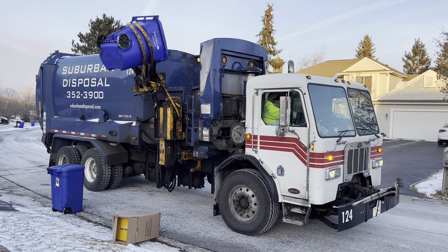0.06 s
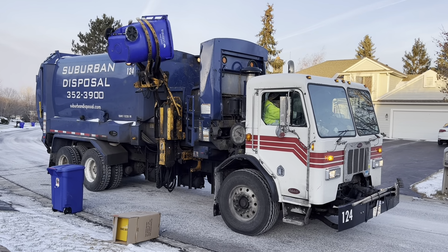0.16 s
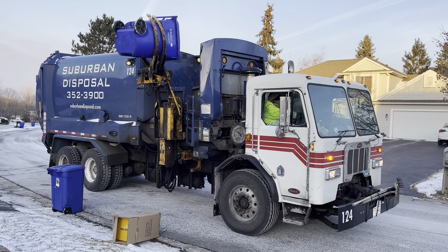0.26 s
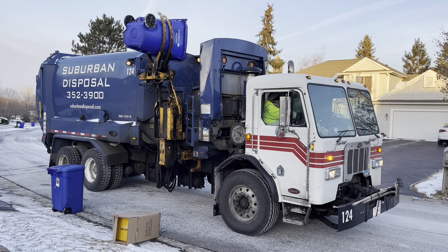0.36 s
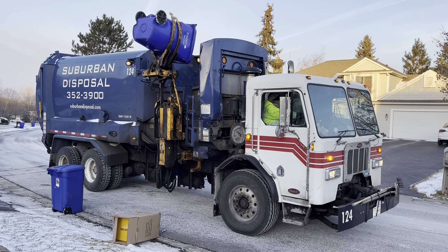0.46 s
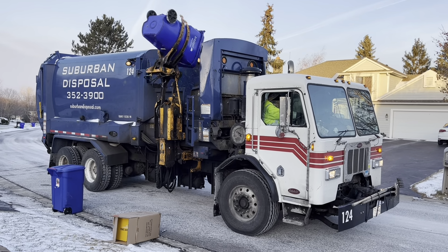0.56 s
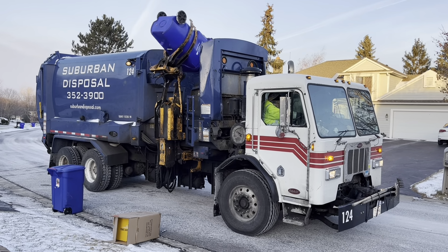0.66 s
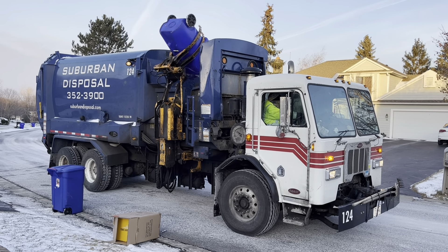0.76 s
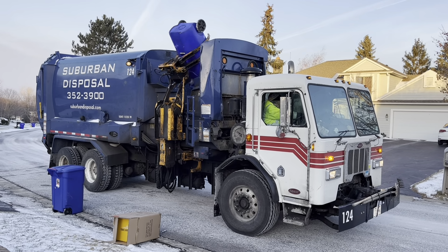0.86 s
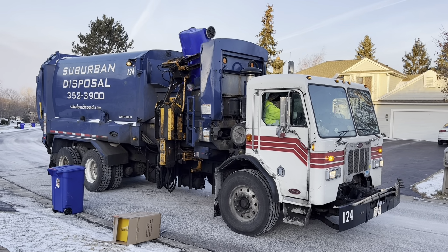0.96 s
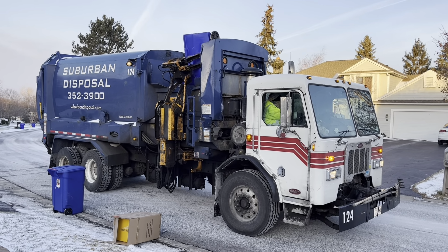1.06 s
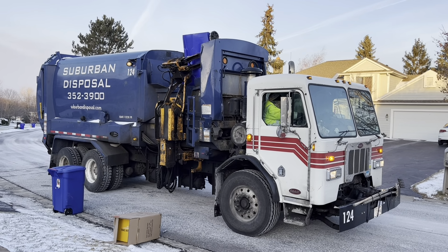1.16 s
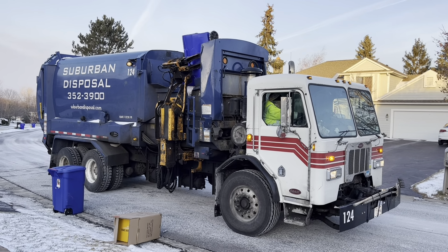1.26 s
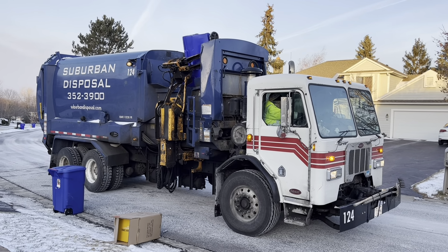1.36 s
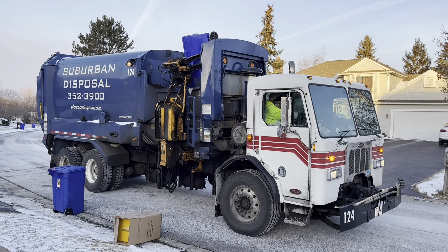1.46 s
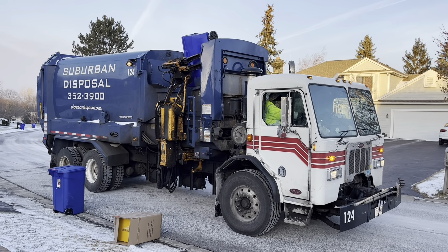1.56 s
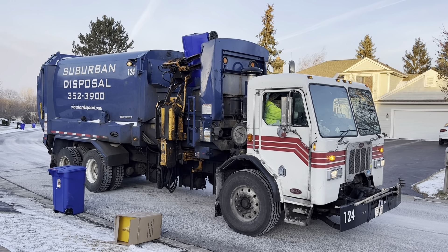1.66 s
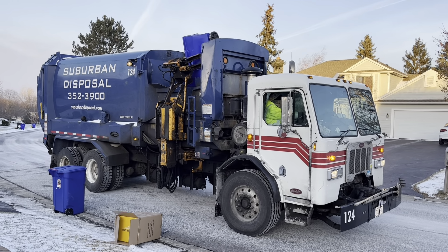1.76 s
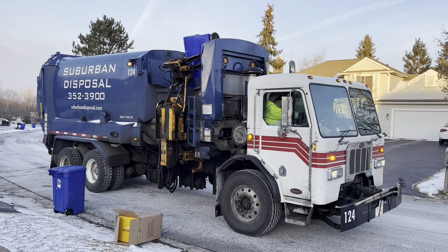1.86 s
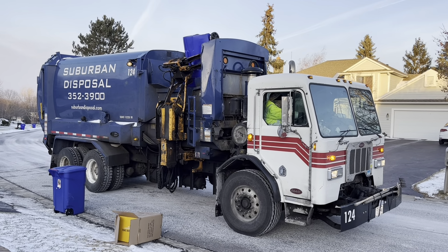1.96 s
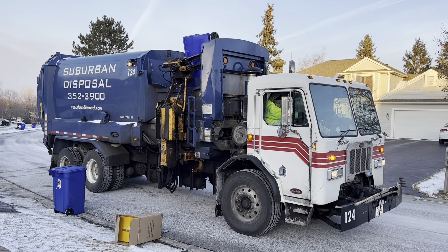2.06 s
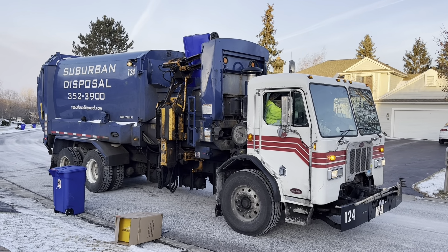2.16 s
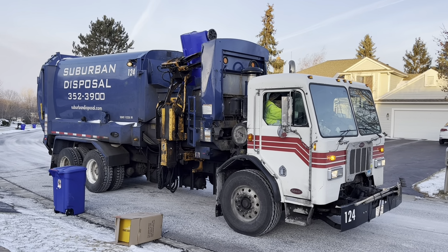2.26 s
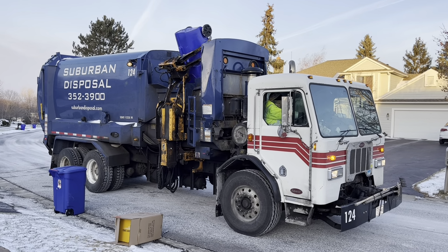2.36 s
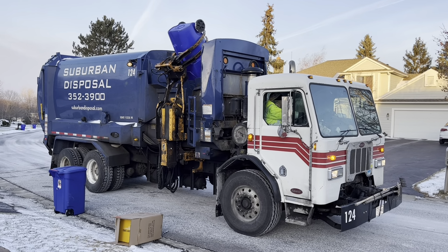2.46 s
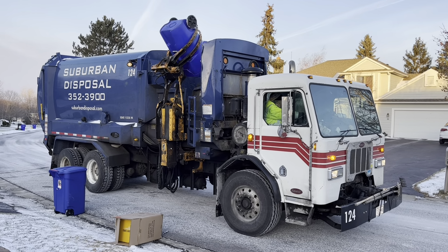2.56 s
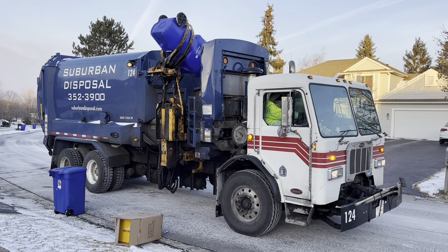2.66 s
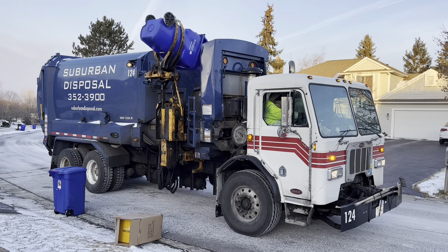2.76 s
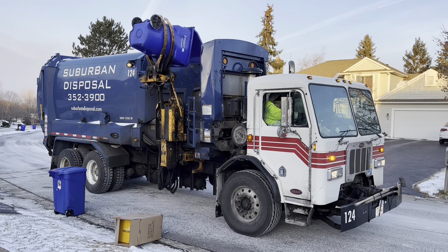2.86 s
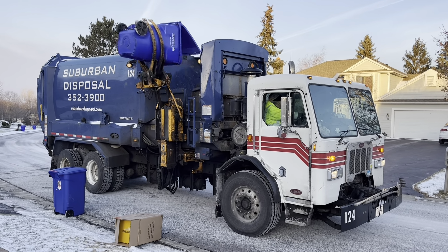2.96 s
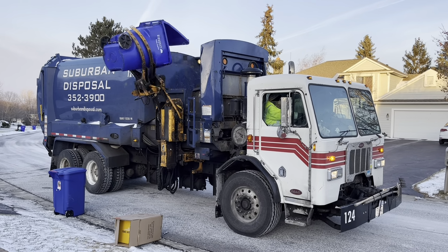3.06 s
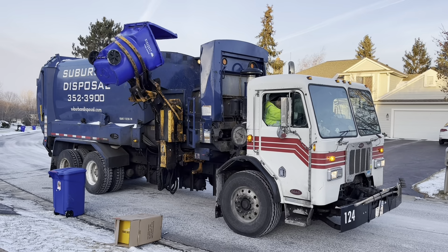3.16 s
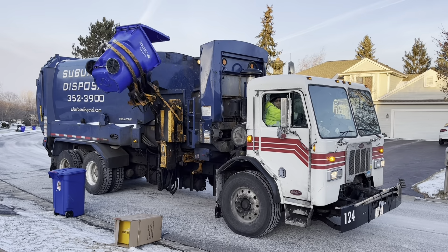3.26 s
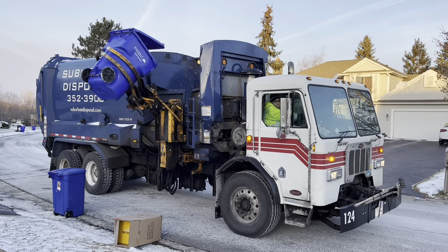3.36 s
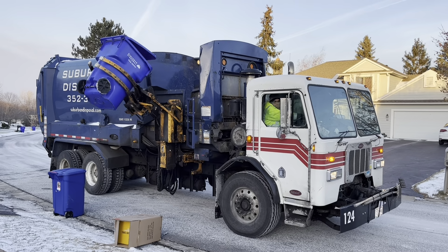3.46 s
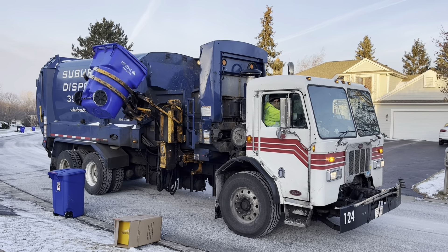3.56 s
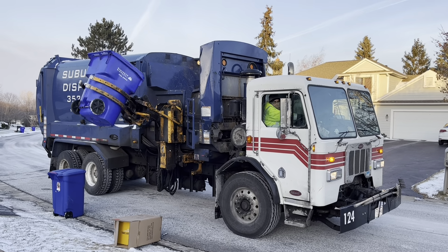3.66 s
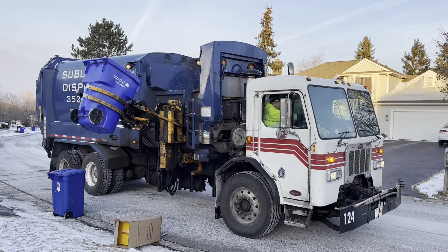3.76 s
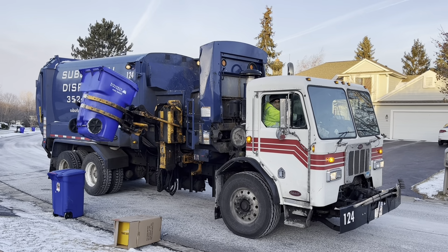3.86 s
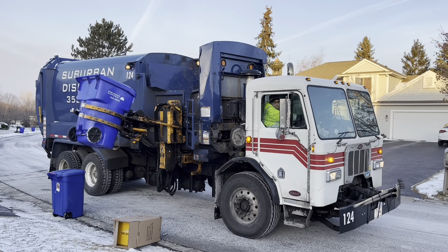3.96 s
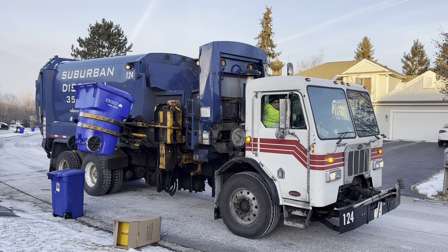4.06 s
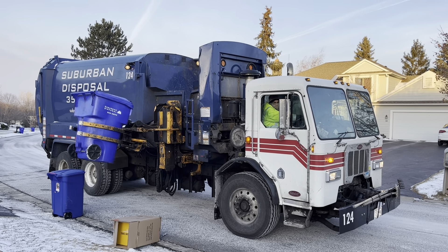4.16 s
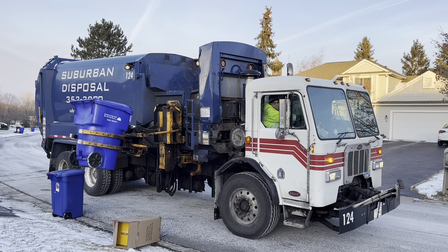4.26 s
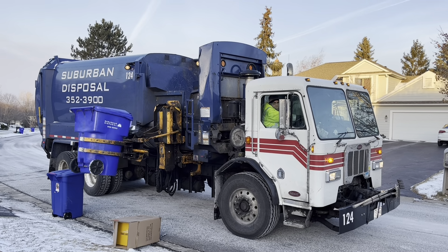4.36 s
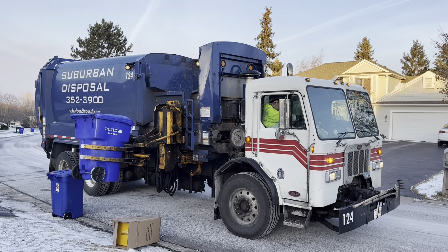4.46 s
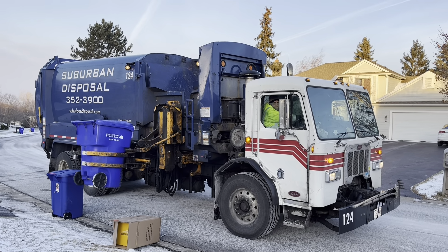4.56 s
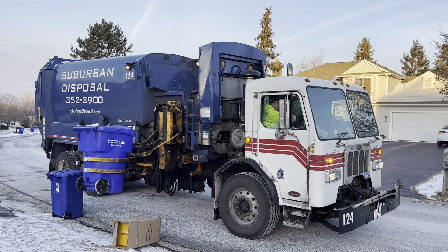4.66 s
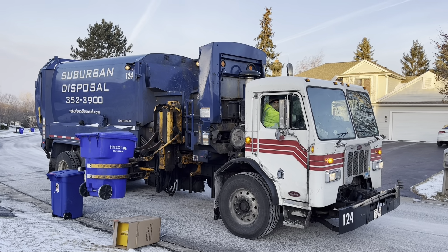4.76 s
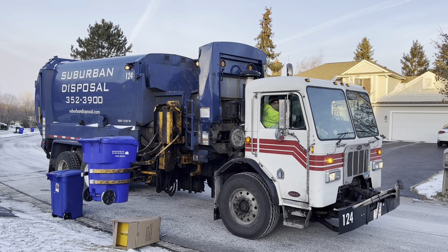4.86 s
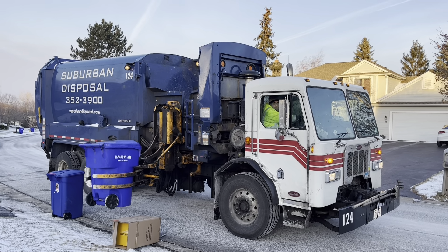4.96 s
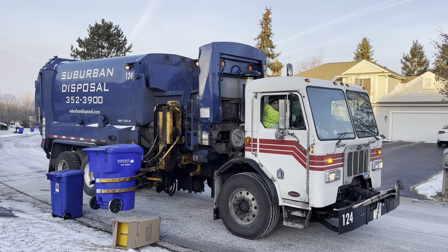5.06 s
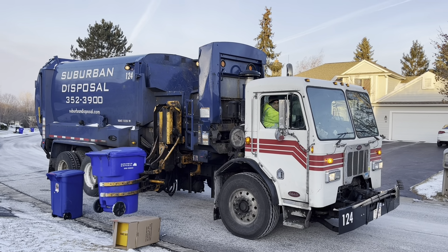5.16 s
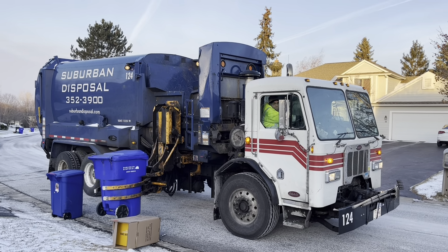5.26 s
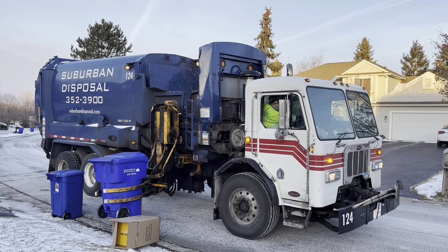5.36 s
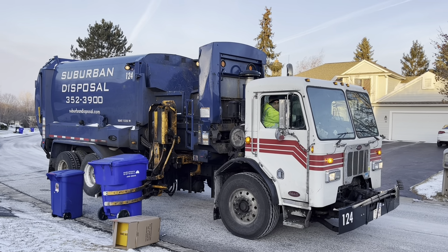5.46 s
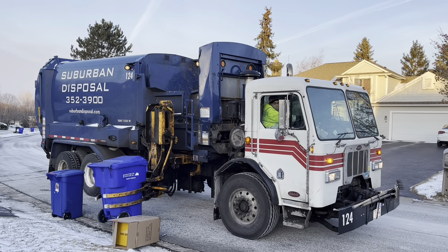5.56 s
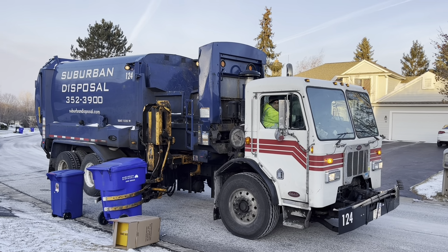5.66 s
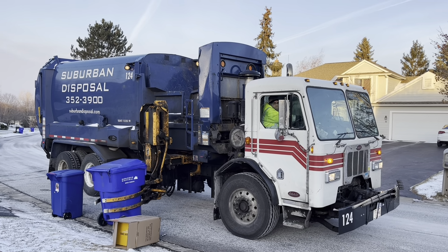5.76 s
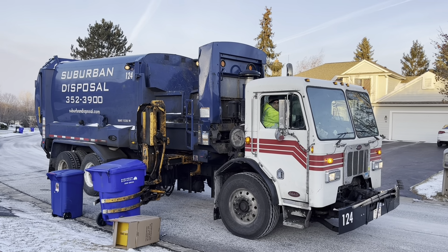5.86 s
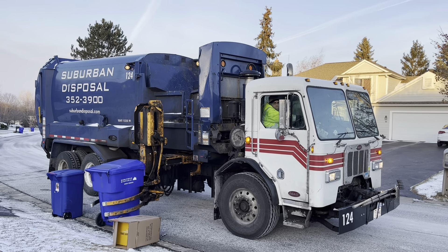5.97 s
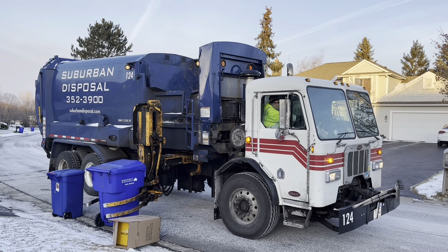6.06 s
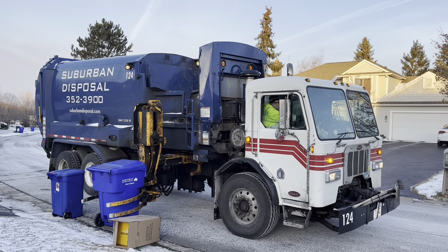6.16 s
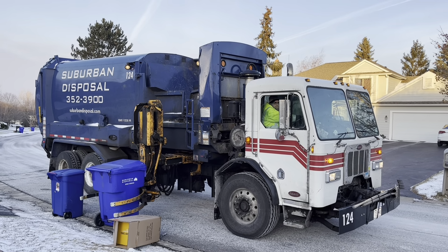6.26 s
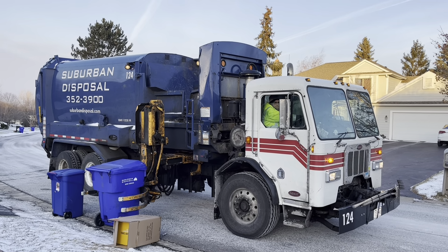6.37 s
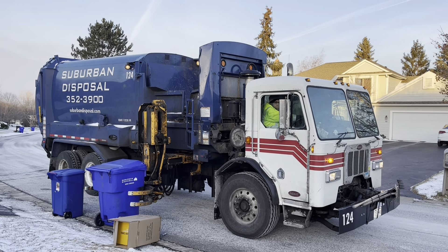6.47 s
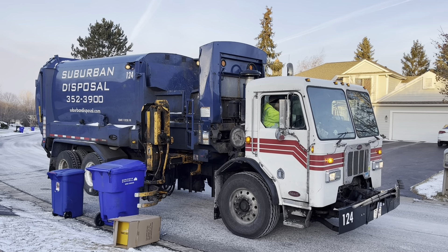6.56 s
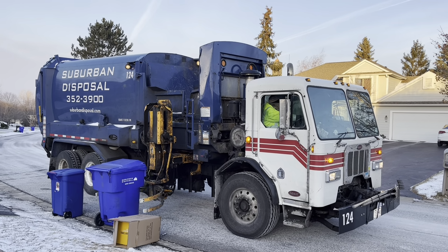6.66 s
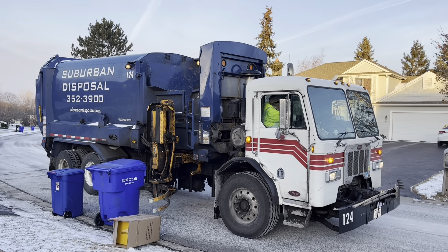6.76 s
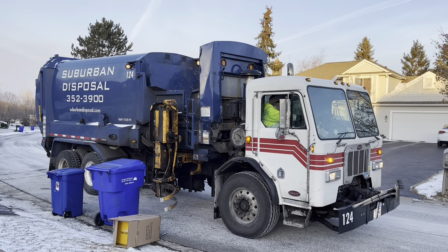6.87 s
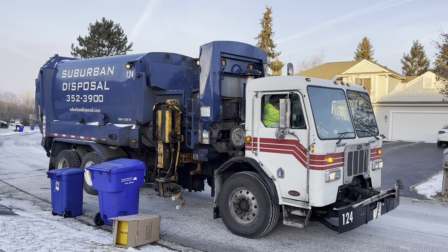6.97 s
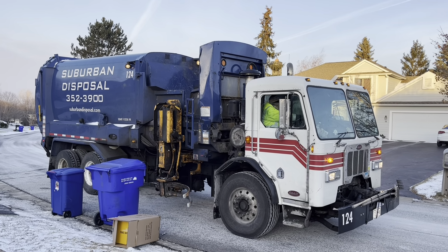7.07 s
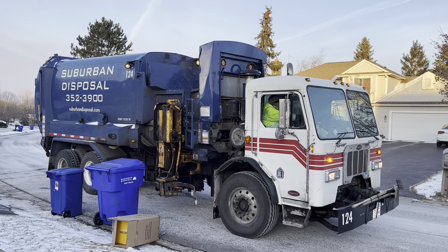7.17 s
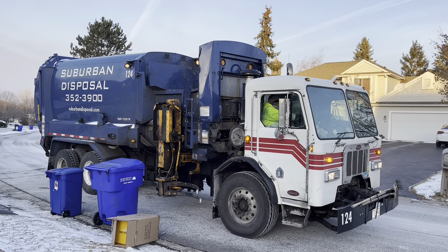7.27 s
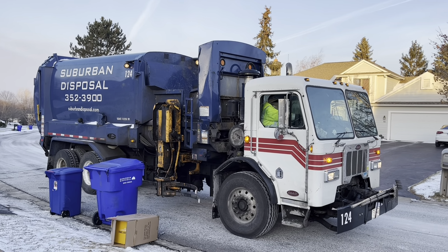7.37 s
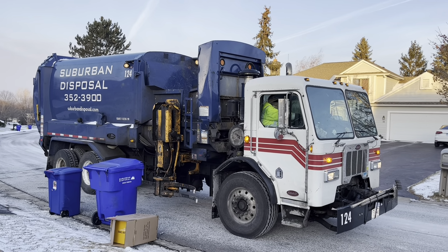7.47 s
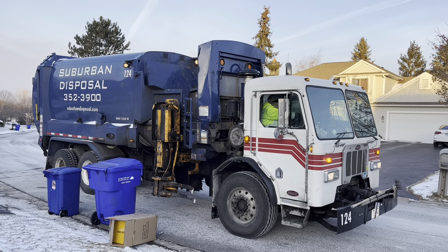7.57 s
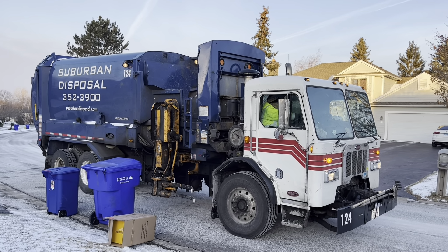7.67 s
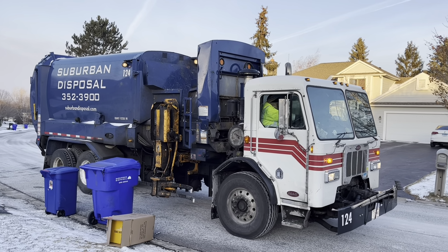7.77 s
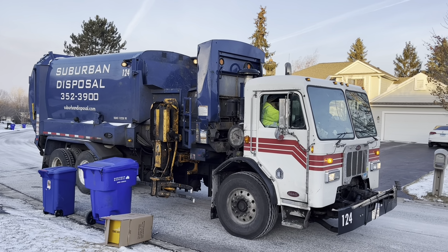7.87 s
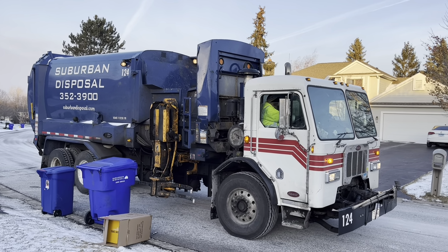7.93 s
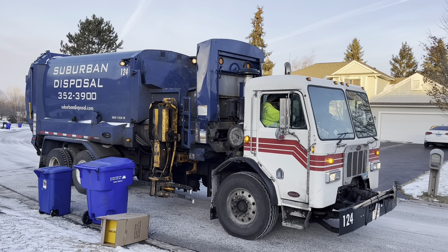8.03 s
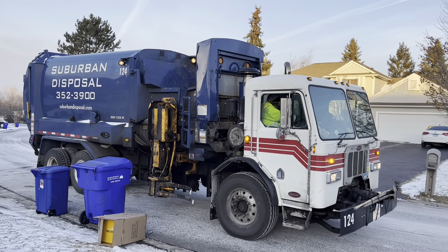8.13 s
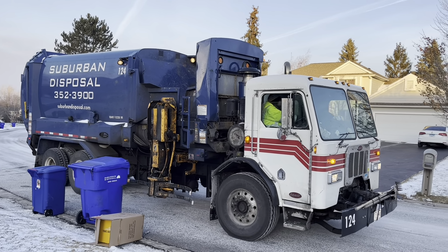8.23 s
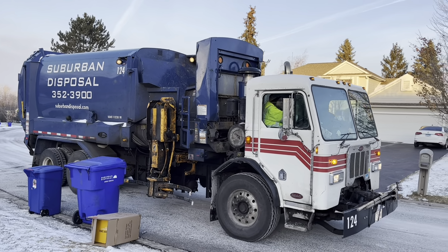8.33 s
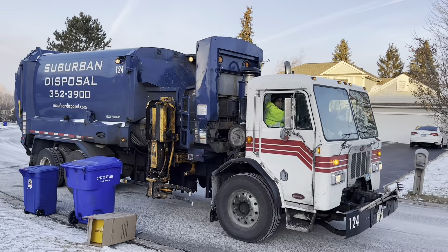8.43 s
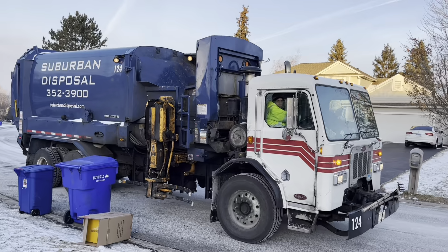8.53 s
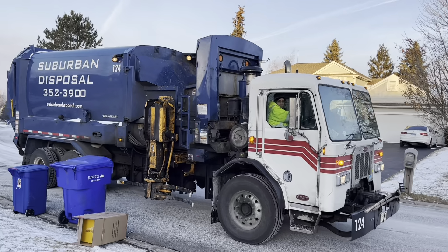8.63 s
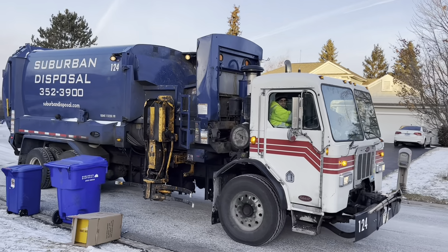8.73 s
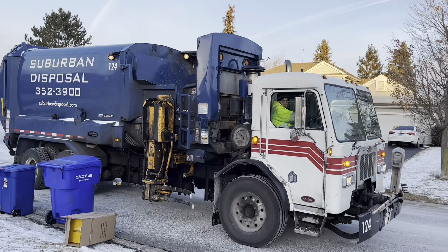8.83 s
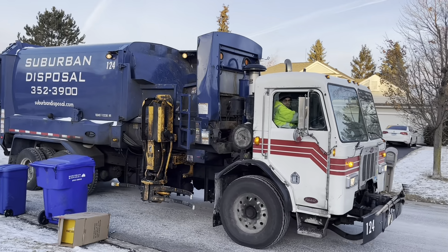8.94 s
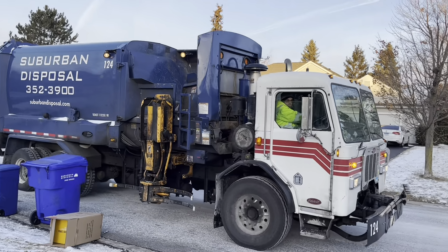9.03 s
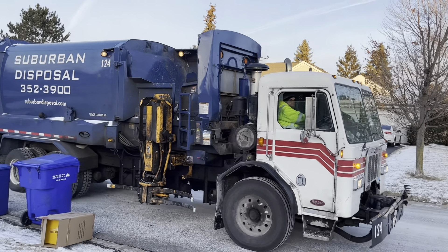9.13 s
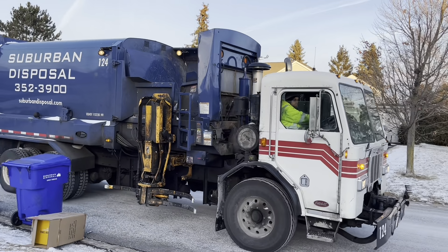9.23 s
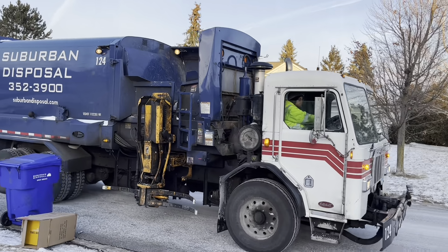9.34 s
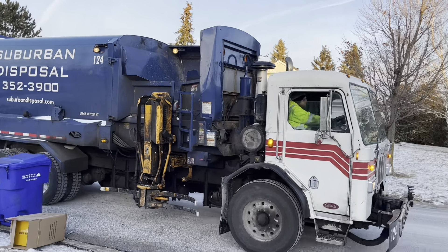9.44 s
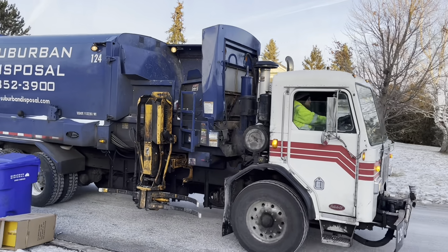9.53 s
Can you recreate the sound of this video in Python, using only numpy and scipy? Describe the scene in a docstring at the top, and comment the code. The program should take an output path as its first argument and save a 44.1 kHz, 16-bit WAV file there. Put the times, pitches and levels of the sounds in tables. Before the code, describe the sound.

Close by on a residential street, a diesel refuse truck idles with a steady pump hum while its arm slams a plastic bin against the hopper. More crashes follow, then hollow thumps as the bin swings down. The grip rasps free, steel fingers clank and fold, air brakes hiss, and the truck pulls away with rising engine roar and whine. Stereo microphone at the kerb, short echoes from houses.

```python
"""A diesel refuse truck idles in a street while its hydraulic arm shakes a plastic cart over the hopper,
swings it down with hollow thumps, sets it on the kerb and folds away with steel clanks.
The air brake lets go and the truck pulls off, its pump whine and turbo whistle rising with the engine.
The engine is noise pulsing at the firing rate, the pump and whistles are sines with wavering pitch,
and the blows are bursts of noise and dying sines; house fronts add echoes."""
import sys
import numpy as np
from scipy import signal
from scipy.fft import rfft, irfft, next_fast_len
from scipy.io import wavfile
from scipy.ndimage import uniform_filter1d

SR = 44100
rng = np.random.default_rng(int(sys.argv[2]) if len(sys.argv) > 2 else 0)


def waveform_to_disk(signal):
    """Save audio, clipped to [-1, 1], as 16-bit WAV at the path in sys.argv[1]."""
    frames = np.transpose(np.atleast_2d(signal))
    scaled = np.clip(frames, -1, 1) * 32767
    samples = np.round(scaled).astype(np.int16)
    wavfile.write(sys.argv[1], SR, samples)


N = 423360

# strokes of the arm load the engine: lift, tip, shake, swing out, lower, brake, let go, draw in, fold, stow
# (start [s], end [s], rumble level [dB], roar level [dB, before the engine's trim],
#  pump hum against its usual level [dB])
ARM_STROKES = [(0, 0.858, -28.5, -28, 1.5), (0.968, 1.38, -24, -25.5, -3), (1.468, 2.805, -29.5, -27, 2),
               (2.883, 3.504, -23, -28, 2), (3.59, 4.5, -26, -26.5, -0.5), (4.7, 4.862, -27.5, -26, -8),
               (5.873, 6.26, -29, -26.5, 0), (6.426, 6.705, -24, -25, -7), (7.16, 7.496, -35, -26.5, -6),
               (7.606, 7.917, -29.5, -25.5, 3.5)]
THROTTLE_CLATTER_DB = 2.5  # rise of the clatter from no throttle to full throttle
CLATTER_DB_PER_OCTAVE = 9.5  # growth of the clatter each time the engine speed doubles


def from_db(db):
    """Turn decibels into a gain."""
    return 10 ** (np.asarray(db) / 20)


def rms_one(x):
    """Scale a sound to unit power."""
    return x / np.sqrt(np.mean(x ** 2) + 1e-20)


def in_time(rows):
    """Read each column of a curve at every sample, with straight lines between its points."""
    s, *columns = np.transpose(rows)
    t = np.arange(N) / SR
    return [np.interp(t, s, column) for column in columns]


def at_bins(points, size=N):
    """Read a table over log frequency at the bins of an FFT."""
    hz, value = np.transpose(points)
    bin_hz = np.arange(size // 2 + 1) * SR / size
    return np.interp(np.log(bin_hz + 1), np.log(hz), value)


def noise(spectrum):
    """Make noise of a given colour and unit power by shaping white noise."""
    white = rfft(rng.standard_normal(N))
    return rms_one(irfft(white * from_db(at_bins(spectrum)), N))


def drift(rate):
    """Make a slow random curve of spread 1; a higher rate [Hz] wanders faster."""
    size = N // 20  # drawn at every 20th sample
    hz = np.arange(size // 2 + 1) * SR / N
    slow = irfft(rfft(rng.standard_normal(size)) / (1 + (hz / rate) ** 2), size)
    return np.interp(np.arange(N) / 20, np.arange(size), rms_one(slow))


def band(x, low_hz, high_hz):
    """Keep only the range between two frequencies."""
    edges = [low_hz, min(high_hz, .45 * SR)]
    return signal.sosfilt(signal.butter(3, edges, "band", fs=SR, output="sos"), x)


def band_noise(low_hz, high_hz, size=N):
    """Make noise of unit power between two frequencies."""
    return rms_one(band(rng.standard_normal(size), low_hz, high_hz))


def ring(clicks, hz, t60):
    """A unit click sets a sine of height 1 ringing; it falls by 60 dB in t60 seconds."""
    r, w = from_db(-60 / (t60 * SR)), 2 * np.pi * hz / SR
    return signal.lfilter([0, np.sin(w)], [1, -2 * r * np.cos(w), r * r], clicks + 1e-18)


def fade(clicks, t60):
    """A unit click starts a level of 1 that falls by 60 dB in t60 seconds."""
    return signal.lfilter([1], [1, -from_db(-60 / (t60 * SR))], clicks + 1e-18)


def clicks_at(times, sizes):
    """Place one click for each event."""
    return np.bincount((np.asarray(times) * SR).astype(int), sizes, N)[:N]


def struck(times, level_db, modes, spread_db):
    """Every blow excites each ringing mode with a random strength and sign of its own."""
    chance = rng.standard_normal((len(times), len(modes), 2))
    total = 0
    for k, (hz, db, t60) in enumerate(modes):
        strength = from_db(level_db + db + spread_db * chance[:, k, 0])
        sign = np.sign(chance[:, k, 1])
        total = total + ring(clicks_at(times, strength * sign), hz, t60)
    return total


def tone(hz, waver, rate):
    """Make a sine of unit power whose pitch wavers by a share of itself."""
    wavering_hz = hz * (1 + waver * drift(rate))
    return np.sqrt(2) * np.sin(2 * np.pi * np.cumsum(wavering_hz) / SR)


def held(start, end, attack_s, release_s):
    """A gate that opens just ahead of its start, holds, and dies away after its end."""
    t = np.arange(N) / SR
    opening = np.clip((t - start) / attack_s + 1, 0, 1)
    return opening * np.exp(-np.maximum(t - end, 0) / release_s)


def firing_gate(firings, depth, decay, uneven_db):
    """Each firing flares and dies; the six cylinders differ and no two cycles are alike."""
    # strength of each firing in the cycle (level [dB])
    cylinders_db = np.array([0, -1, 0, -2, 0.5, 0])
    index = firings.astype(int)
    chance_db = uneven_db * rng.standard_normal(index.max() + 1)[index]
    strength = from_db(cylinders_db[index % len(cylinders_db)] + chance_db)
    since_firing = firings % 1  # as a share of the gap between firings
    return rms_one(1 + depth * strength * np.exp(-since_firing / decay))


def under_load(column, rest_db):
    """The load builds up before each arm stroke, holds, and ebbs to a resting level [dB] after it."""
    levels = []
    for (start, end, *_), db in zip(ARM_STROKES, column):
        levels.append(from_db(db) * held(start, end, attack_s=0.2, release_s=0.35))
    return 20 * np.log10(np.maximum(np.max(levels, axis=0), from_db(rest_db)))


def engine(tooth_hz, octaves, throttle, load_rumble_db, load_roar_db):
    """Exhaust, block and combustion clatter pulse at the firing rate; load, throttle and speed set them."""
    # colours of the engine's three voices (frequency [Hz], level per Hz [dB])
    rumble_spectrum = [(20, -29), (35, -13), (55, -0.5), (85, 3.5), (125, 0), (195, -0.5), (280, -7),
                       (350, -9.5), (600, -41.5)]
    roar_spectrum = [(170, -16.5), (270, -15.5), (370, -0.5), (480, -0.5), (620, -3), (760, -4),
                     (1000, -10.5), (1400, -41), (2800, -78)]
    clatter_spectrum = [(560, -14), (950, -7.5), (1250, -4.5), (1600, -8.5), (2100, -7), (2900, -12.5),
                        (3800, -14.5), (5200, -23.5), (7300, -21), (9300, -27.5), (12000, -26),
                        (15000, -30)]
    # the deepest boom of the body swells and sinks (time [s], level of the lowest bass [dB])
    deep_curve = [(2.2, 5), (2.4, 4), (4.4, 12.5), (4.6, -4), (5.2, 8), (6.1, 0), (8.35, -10), (8.55, 14)]
    teeth_per_firing = 5.1  # pump teeth that pass between two firings
    drive_rumble_db, drive_roar_db = -29.5, -27  # at full throttle, before the growth with speed
    roar_db_per_octave, roar_trim_db = 12.5, -0.98
    idle_clatter_db = -34.4

    rumble_db = (1 - throttle) * load_rumble_db + throttle * drive_rumble_db
    roar_db = (1 - throttle) * load_roar_db + throttle * drive_roar_db
    roar_db = roar_db + roar_db_per_octave * octaves + roar_trim_db
    clatter_db = idle_clatter_db + throttle * THROTTLE_CLATTER_DB + CLATTER_DB_PER_OCTAVE * octaves
    # the exhaust pipe booms most at 0.56 octaves above idle speed and fades to either side
    pipe_db = -21.5 - 25 * np.abs(octaves - 0.56)
    deep_db, = in_time(deep_curve)
    firings = np.cumsum(tooth_hz / teeth_per_firing) / SR

    exhaust = noise(rumble_spectrum)
    deep = signal.sosfiltfilt(signal.butter(4, 60, fs=SR, output="sos"), exhaust)
    exhaust = exhaust + (from_db(deep_db) - 1) * deep
    rumble = from_db(rumble_db) * exhaust
    rumble = rumble * firing_gate(firings, depth=0.32, decay=0.1, uneven_db=4.0)
    roar = from_db(roar_db) * noise(roar_spectrum)
    roar = roar * firing_gate(firings, depth=0.54, decay=0.17, uneven_db=1.5)
    clatter = from_db(clatter_db) * noise(clatter_spectrum)
    clatter = clatter * firing_gate(firings, depth=0.31, decay=0.98, uneven_db=5.0)
    pipe = throttle * from_db(pipe_db) * band_noise(116, 284)
    pipe = pipe * firing_gate(firings, depth=0.81, decay=0.71, uneven_db=6.5)
    return rumble + roar + clatter + pipe


def pump_hum(tooth_hz, octaves, throttle, strain_db):
    """The gear pump hums on its tooth rate and swells as it sweeps the frame's resonances."""
    # harmonics 1 to 4
    # (level with no throttle [dB], rise on throttle [dB], rise per octave of speed [dB])
    harmonics = [(-35, -0.5, 2), (-46, 14, 8), (-52, 11.5, 9.5), (-48, 12.5, -5.5)]
    # frame resonances that the harmonics sweep (frequency [Hz], half width [Hz], lift [dB])
    resonances = [(256, 12.3, 12.5), (325, 29.7, 16), (353, 6.5, 4), (450, 25, 8.5), (561, 25, 5.5),
                  (648, 26, 4.5), (723, 12, 8), (940, 40, 4.5), (1120, 55, 0)]
    roughness = 0.44  # on throttle: size of each harmonic's rough skirt against its clean line
    turn = 2 * np.pi * np.cumsum(tooth_hz * (1 + 0.0019 * drift(14.0))) / SR
    hum = 0
    for k, (db, throttle_db, octave_db) in enumerate(harmonics, 1):
        frame_db = sum(lift_db * np.exp(-((k * tooth_hz - hz) / width) ** 2)
                       for hz, width, lift_db in resonances)
        level_db = db + (1 - throttle) * strain_db + throttle * throttle_db
        level_db = level_db + frame_db + octave_db * octaves + 2.2 * drift(30)
        skirt = drift(68) * np.sin(k * turn) + drift(60) * np.cos(k * turn)
        clean = np.sqrt(2) * np.sin(k * turn)
        hum = hum + from_db(level_db) * (clean + throttle * roughness * skirt)
    return hum


def valve_whistles():
    """Oil sings in the valves: sines whose pitch wavers and whose level flutters."""
    # (start [s], end [s], pitch [Hz], level [dB], pitch waver [share], flutter [dB])
    whistles = [(0, 1.25, 2170, -43.5, 0.0016, 1.5), (0, 1.3, 3208, -47, 0.0005, 1.2),
                (2.55, 3.0, 2166, -50, .003, 2), (3.9, 4.25, 2166, -45.5, 0.003, 1.5),
                (4.5, 5.3, 2166, -51, .003, 2), (2.1, 4.7, 3208, -56, .0008, 3),
                (3.8, 6.1, 1462, -50, 0.0033, 2.5)]
    total = 0
    for start, end, hz, db, waver, flutter_db in whistles:
        level = from_db(db + flutter_db * drift(15)) * held(start, end, attack_s=0.2, release_s=0.2)
        total = total + level * tone(hz, waver, rate=35.5)
    return total


def clanks():
    """A blow cracks, rattles the steel panels, rings hopper and arm, and has a dull rebound."""
    # blows of arm and cart on the steel body; the levels are taken before the offsets further down
    # (time [s], crash level [dB], weight: lows above the crash [dB], first crack level [dB])
    blows = [(0.803, -40, 11, -38), (0.902, -25, 15, -35), (0.931, -20, 6, -22), (0.981, -19, 9, -27),
             (0.992, -23, 11, -25), (1.028, -23, 9, -25), (1.036, -26, 21, -30), (1.397, -27, 11.5, -35),
             (3.132, -14.5, 8.5, -29), (3.167, -16, 12, -18), (3.196, -26, 12, -30),
             (3.339, -21.5, 11, -22), (3.575, -25, 10, -36), (3.632, -15, 10, -13), (3.667, -23.5, 12, -28),
             (5.783, -24, 14, -32), (6.237, -26.5, 8, -25), (6.261, -23.5, 11, -22), (6.476, -40, -12, -31),
             (6.76, -22.5, 2.5, -16), (6.911, -26, 5, -33), (6.978, -26.5, 3, -31.5),
             (7.062, -21, 3.5, -32), (7.089, -21.5, 3, -28), (7.143, -26, 2, -30), (7.34, -24.5, -0.5, -26)]
    # colours of the rattling panels and of steel meeting steel (frequency [Hz], level per Hz [dB])
    panel_spectrum = [(100, 17), (200, -3.5), (370, 3.5), (1200, -23), (1580, -29), (1750, -20),
                      (2100, -24.5), (2550, -23), (3000, -28), (3950, -23), (5000, -31.5), (9000, -30.5),
                      (15000, -46)]
    crack_spectrum = [(300, 5), (800, 2), (2000, 5), (4300, -3), (6500, -8), (11000, -16.5), (15000, -13)]
    # ringing hopper panels and steel arm (frequency [Hz], level [dB], time to fall 60 dB [s])
    hopper_modes = [(346.7, -3, 0.93), (400, -4, 0.14), (444.6, -4.5, 0.38), (520, -4.5, 0.11)]
    arm_modes = [(787, 1, 0.088), (1216, -3, 0.14), (1474, -7.5, 0.092), (1790, -14, 0.03),
                 (1960, -3, 0.017), (2160, -6.5, 0.14), (4130, -13, 0.04), (4700, -13, 0.093),
                 (5000, -29, 0.06)]
    rebound_s, rebound_db = .024, -6.5  # the load drops back with a second knock
    seat = np.exp(-1 / (0.0034 * SR))  # loose joints take a few milliseconds to close

    s, middle_db, weight_db, crack_db = np.transpose(blows)
    high_db = middle_db - 7.5 - 0.83 * weight_db  # heavy blows have duller treble
    low_db = middle_db + weight_db
    knock_s = np.append(s, s + rebound_s)
    knock_db = np.append(low_db, low_db + rebound_db)
    panels = noise(panel_spectrum) * from_db(0.5 * drift(110))
    crack_level = fade(clicks_at(s, from_db(crack_db)), t60=0.033)
    crack = noise(crack_spectrum) * uniform_filter1d(crack_level, size=130)

    def crash(times, level_db, low_hz, high_hz, t60, tail_db, tail_t60):
        """One range of the panels' rattle: a quick crash and a weaker, longer tail."""
        clicks = clicks_at(times, from_db(level_db) ** 2)
        energy = signal.lfilter([1 - seat], [1, -seat], clicks + 1e-18)
        # energy is a level squared, so its decay takes half the time
        tail = from_db(tail_db) ** 2 * fade(energy, tail_t60 / 2)
        level = np.sqrt(fade(energy, t60 / 2) + tail)
        return level * rms_one(band(panels, low_hz, high_hz))

    low = crash(knock_s, knock_db - 8.5, 191, 670, t60=0.25, tail_db=-14.5, tail_t60=0.71)
    middle = crash(s, middle_db + 1.86, 666, 2190, t60=0.13, tail_db=-6.0, tail_t60=0.47)
    high = crash(s, high_db, 1920, 20000, t60=0.25, tail_db=-7, tail_t60=0.87)
    hopper = struck(knock_s, knock_db - 17.0, hopper_modes, spread_db=4.0)
    steel_arm = struck(s, middle_db - 13.5, arm_modes, spread_db=6.0)
    return crack + low + middle + high + hopper + steel_arm


def thumps():
    """A soft knock makes a hollow wall drum for a few cycles; crowded modes nearby add a dull boom."""
    # heavy bumps of the hollow cart and, once under way, of the truck's body
    # (time [s], level before the drum's and wall's offsets [dB], drum pitch [Hz])
    bumps = [(0.062, -9.5, 151), (1.037, -9, 337), (1.06, -7, 404), (1.064, -4, 57), (1.116, -13.5, 116),
             (2.382, -6.5, 58.4), (2.719, -13.5, 102), (2.95, -15, 75.4), (3.188, -8, 54),
             (3.481, -9, 109.5), (4.066, -8.5, 102), (4.125, -12, 167), (4.155, -12.5, 176),
             (4.19, -8.5, 110), (4.273, -5.5, 233), (4.284, -4.5, 132), (4.312, -9, 240),
             (4.332, -2.5, 201), (4.334, -15, 435), (4.54, -17, 154), (4.565, -22, 234),
             (4.612, -11.5, 199), (4.645, -15.5, 299), (4.671, -11, 310), (4.727, -9.5, 390),
             (4.795, -10, 455), (4.828, -15, 260), (4.877, -14, 290), (4.926, -14.5, 337), (5.01, -15, 405),
             (5.027, -12.5, 140), (5.066, -15.5, 173), (8.765, -8.5, 134), (9.472, -4, 342)]
    drum_t60, wall_t60 = 0.056, 0.091  # time to fall 60 dB [s]
    push_s = 0.00077  # how softly the knock sets in
    out = np.zeros(N + SR)
    t = np.arange(SR // 3) / SR
    for s, db, hz in bumps:
        drum = from_db(2.0 - 60 * t / drum_t60) * np.sin(2 * np.pi * hz * t)
        wall = from_db(-6.0 - 60 * t / wall_t60) * band_noise(0.46 * hz, 1.52 * hz, len(t))
        start = int(s * SR)
        out[start:start + len(t)] += from_db(db) * (1 - np.exp(-t / push_s)) * (drum + wall)
    return out[:N]


def arm():
    """The pivot groans, the frame shudders in uneven throbs and the rubber grip rasps."""
    # the pivot groans as the arm slows (time [s], pitch [Hz], level before a 7 dB lift [dB])
    groan_curve = [(5.2, 880, -62), (5.245, 925, -38), (5.268, 1020, -42), (5.3, 1060, -39.5),
                   (5.35, 1050, -60), (5.49, 760, -44), (5.68, 740, -41), (5.9, 682, -80)]
    # the arm shudders where it speeds up or brakes with the cart
    # (time of the peak [s], level before a 3 dB cut [dB], rise [dB/s], fall [dB/s])
    shudders = [(1.05, -17, 200, 54), (2.9, -22, 55, 27), (4.31, -19, 51, 150), (4.68, -22, 60, 130),
                (4.86, -22, 110, 80)]
    # the grabber's rubber slides off the cart (time [s], level [dB])
    slide_curve = [(6.02, -100), (6.1, -44), (6.17, -40), (6.27, -100)]
    t = np.arange(N) / SR
    groan_hz, groan_db = in_time(groan_curve)
    slide_db, = in_time(slide_curve)
    shudder_db = np.max([db - np.maximum(rise * (s - t), fall * (t - s))
                         for s, db, rise, fall in shudders], axis=0)
    shudder = from_db(shudder_db - 3.0 + 1.5 * drift(33)) * band_noise(110, 527)
    groan = from_db(groan_db + 7.0 + 1.5 * drift(60)) * tone(groan_hz, waver=0.04, rate=220.0)
    rasp = from_db(slide_db) * band_noise(3140, 4000)
    return groan + shudder + rasp


def jingle(events, modes, bounce_s, loss_db, count=4):
    """A loose part strikes and bounces, at uneven gaps and weaker each time."""
    s, event_db = np.transpose(events)
    bounce = np.arange(count)
    gaps = bounce_s * (.5 + rng.random((len(s), count))) * (bounce > 0)
    times = s[:, None] + np.cumsum(gaps, axis=1)
    level_db = event_db[:, None] - 6.0 - loss_db * bounce
    return struck(times.ravel(), level_db.ravel(), modes, spread_db=3.5)


def fittings():
    """The arm's steel parts, each with a ring of its own: link, pin, fingers and latch."""
    # a loose steel link clinks, a small pin tinkles in its hole (time [s], level before a 6 dB cut [dB])
    clinks = [(0.944, -27), (0.96, -36), (1.005, -30), (1.035, -32), (1.091, -29), (3.18, -31),
              (6.265, -32), (6.318, -30), (6.36, -33), (6.522, -34), (6.975, -36), (7.008, -37),
              (7.638, -34), (7.678, -32)]
    tinkles = [(0.19, -40), (0.97, -36), (1.003, -26), (2.86, -35), (6.458, -37), (6.715, -34),
               (6.775, -36), (7.092, -26), (7.155, -32)]
    # the grabber's fingers hit their stops, the arm drops into its latch (time [s], level [dB])
    finger_stops = [(3.137, -23), (6.262, -20.5), (6.76, -23), (6.981, -29)]
    latch_ticks = [(7.091, -25), (7.098, -39)]
    # how each part rings (frequency [Hz], level [dB], time to fall 60 dB [s])
    link_modes = [(6650, -1.5, 0.12), (6720, -5, 0.066), (9450, -0.5, 0.035), (11800, -9, .07)]
    pin_modes = [(12520, -5, .08), (14160, 3, .09), (14200, -2, .08)]
    finger_modes = [(1305, -19, .12), (1460, -6, .14), (1520, -6, .07), (1910, -1, 0.073),
                    (2080, -9, 0.081), (2220, -9, 0.082)]
    latch_modes = [(5230, -2, 0.05), (5690, -5, 0.084), (6648, -2, 0.094), (9800, -8, .03),
                   (12490, -9, .06), (13500, -12, .03)]
    link = jingle(clinks, link_modes, bounce_s=.007, loss_db=1.5)
    pin = jingle(tinkles, pin_modes, bounce_s=0.0083, loss_db=5.0)
    fingers = struck(*np.transpose(finger_stops), finger_modes, spread_db=3.0)
    latch = struck(*np.transpose(latch_ticks), latch_modes, spread_db=3.0)
    return link + pin + fingers + latch


def air_brake():
    """The brake lets go of its air: a hiss of coloured noise."""
    # (time [s], level [dB])
    vent_curve = [(7.0, -100), (7.12, -39), (7.2, -37), (7.26, -30), (7.38, -32), (7.5, -35.5), (7.9, -65)]
    # (frequency [Hz], level per Hz [dB])
    hiss_spectrum = [(2000, 4), (4000, -4), (9000, -6), (12000, 1), (14500, 2.5)]
    vent_db, = in_time(vent_curve)
    return from_db(vent_db) * noise(hiss_spectrum)


def turbo():
    """The turbocharger spins up: a rising sine whose quick waver makes it breathy."""
    # (time [s], pitch [Hz], level [dB])
    turbo_curve = [(7.7, 7720, -100), (8.15, 9500, -43), (8.45, 10800, -52), (9.1, 11750, -44.5),
                   (9.33, 12850, -40), (9.6, 13850, -43)]
    turbo_hz, turbo_db = in_time(turbo_curve)
    return from_db(turbo_db) * tone(turbo_hz, waver=.016, rate=360)


def scattered_clatter(octaves, throttle):
    """The engine's clatter comes back from all round as a smooth wash, opposite in left and right."""
    # (frequency [Hz], level per Hz [dB])
    scatter_spectrum = [(300, 24), (900, 17), (2000, 10), (4000, 9), (7000, -26), (12000, -73),
                        (15000, -43)]
    idle_db = -49
    level_db = idle_db + throttle * THROTTLE_CLATTER_DB + CLATTER_DB_PER_OCTAVE * octaves
    return from_db(level_db) * noise(scatter_spectrum) * np.array([[1], [-1]])


def street(x):
    """Scattered echoes from the houses arrive from the sides, so they differ between left and right."""
    # house fronts (frequency [Hz], level against the direct sound [dB])
    echo_spectrum = [(50, -9.5), (300, -13), (1000, -15), (4000, -9.5), (12000, -68)]
    t60 = 0.21  # time for the echoes to fall 60 dB [s]
    size = next_fast_len(N + SR)
    t = np.arange(SR // 2) / SR
    scatter = rng.standard_normal(len(t)) * from_db(-60 * t / t60) * (t > .004)
    scatter /= np.sqrt(np.sum(scatter ** 2))
    echo_gain = from_db(at_bins(echo_spectrum, size))
    echoes = irfft(rfft(x, size) * echo_gain * rfft(scatter, size), size)[:N]
    return np.array([x + echoes, x - echoes])


def scene():
    """The whole truck, heard from the kerb: speed, throttle and the arm's load drive engine and pump."""
    # engine speed, as the tooth rate of the pump it drives (time [s], rate [Hz])
    speed_curve = [(7.84, 179), (8.0, 213), (8.2, 240), (8.42, 261), (9.02, 283), (9.2, 312), (9.43, 341),
                   (9.6, 347)]
    tooth_hz, = in_time(speed_curve)
    octaves = np.log2(tooth_hz / tooth_hz[0])  # above idle speed
    pedal_down_s, press_s = 8.03, 0.29  # the pedal is fully down; time taken to press it
    throttle, = in_time([(pedal_down_s - press_s, 0), (pedal_down_s, 1)])
    _, _, rumbles, roars, hums = np.transpose(ARM_STROKES)
    rumble_db = under_load(rumbles, rest_db=-40)
    roar_db = under_load(roars, rest_db=-31)
    strain_db = under_load(hums, rest_db=-9)

    truck = engine(tooth_hz, octaves, throttle, rumble_db, roar_db)
    truck = truck + pump_hum(tooth_hz, octaves, throttle, strain_db) + valve_whistles()
    truck = truck + clanks() + thumps() + arm() + fittings()
    truck = truck + air_brake() + turbo()
    return street(truck) + scattered_clatter(octaves, throttle)


def record(dry):
    """Two microphone ports differ in level and phase; peaks are rounded, deepest bass and top are cut."""
    # (frequency [Hz], left minus right [dB])
    left_db = [(60, 1), (300, 3), (700, 3), (1400, 4), (2600, -1.5), (5000, 5), (9000, -3)]
    # (frequency [Hz], phase by which the left port leads [rad])
    port_phase = [(300, 0), (4500, 0.82), (7500, -2.5), (11000, -5.5), (15000, -9)]
    sides = np.array([[.5], [-.5]])  # each port takes half of the difference
    gain = from_db(sides * at_bins(left_db))
    turn = np.exp(1j * sides * at_bins(port_phase))
    ports = irfft(rfft(dry) * gain * turn, N)
    ports = signal.sosfilt(signal.butter(4, 39, "high", fs=SR, output="sos"), ports)
    rounded = 1.289 * np.tanh(ports / 1.321)
    return signal.sosfilt(signal.ellip(10, .2, 80, 15000, fs=SR, output="sos"), rounded)


dry = scene()
out = record(dry)
waveform_to_disk(out)
```